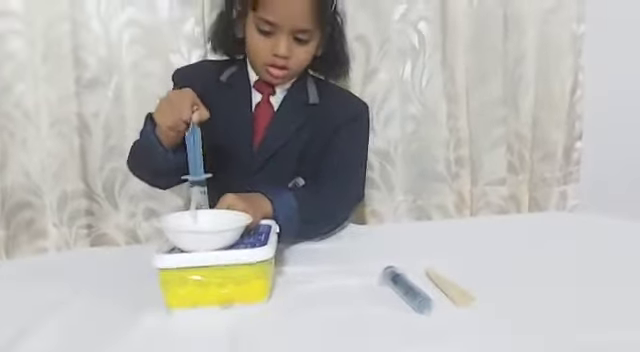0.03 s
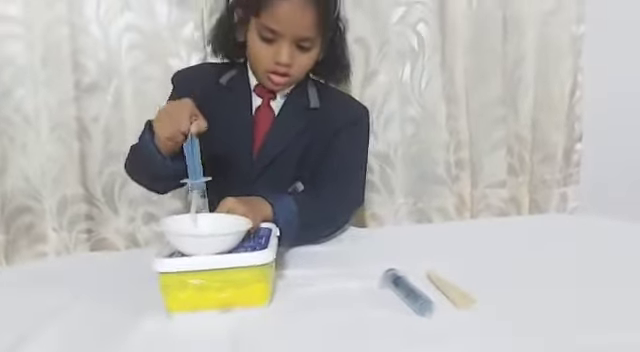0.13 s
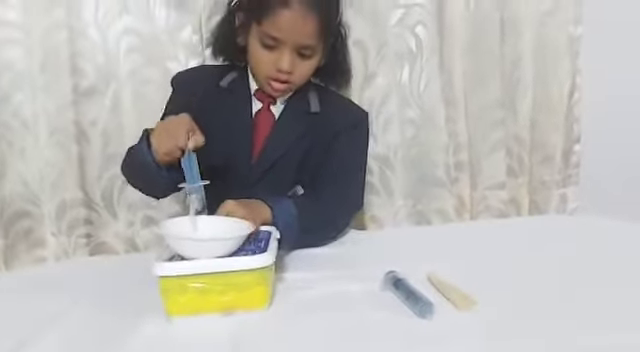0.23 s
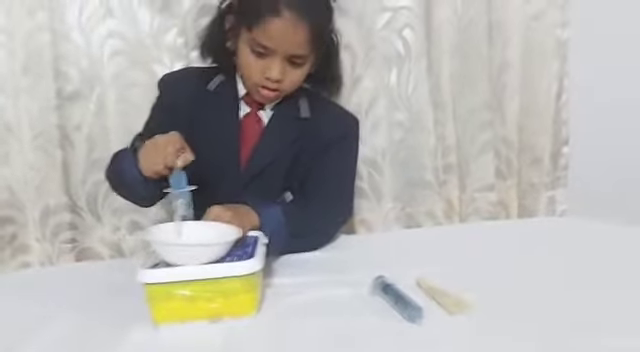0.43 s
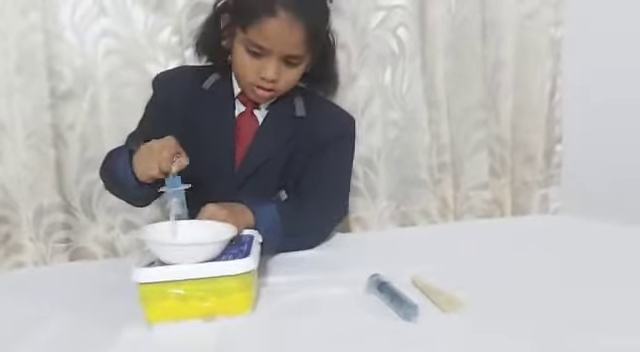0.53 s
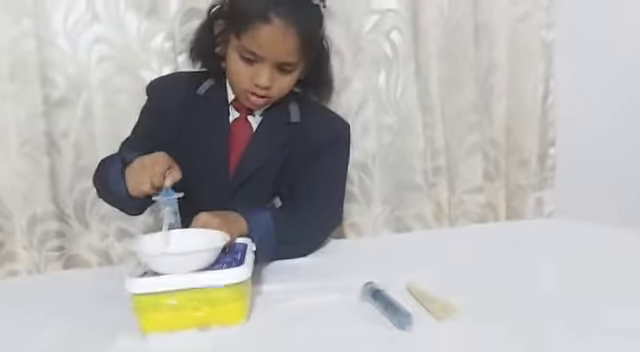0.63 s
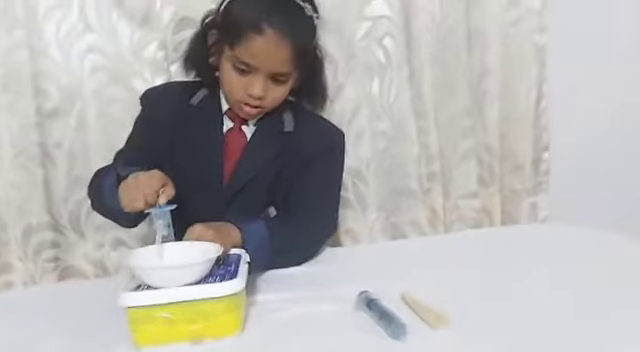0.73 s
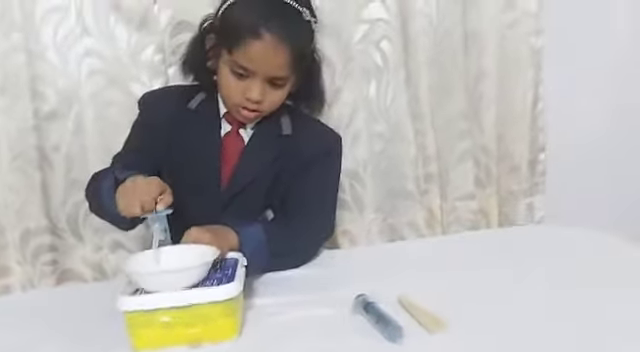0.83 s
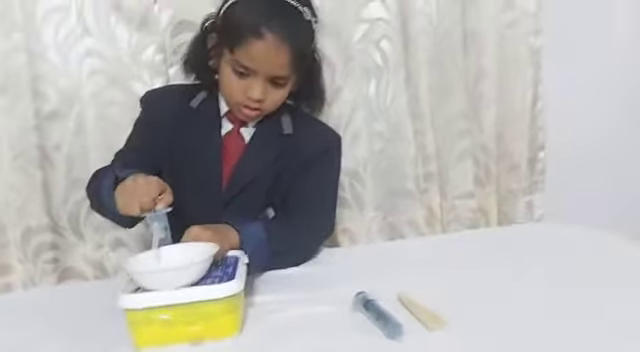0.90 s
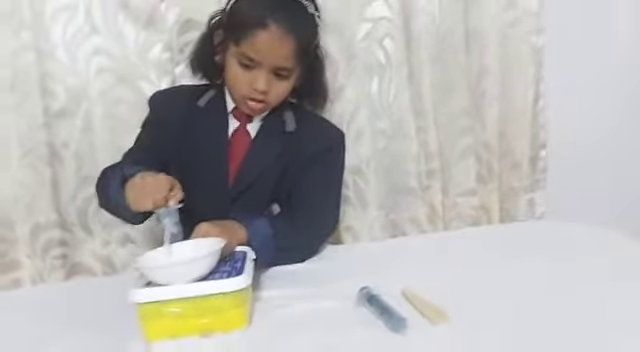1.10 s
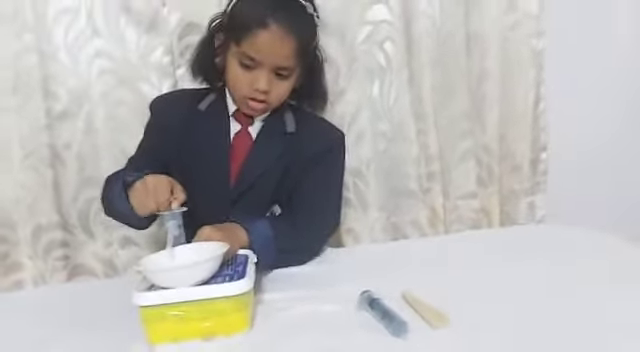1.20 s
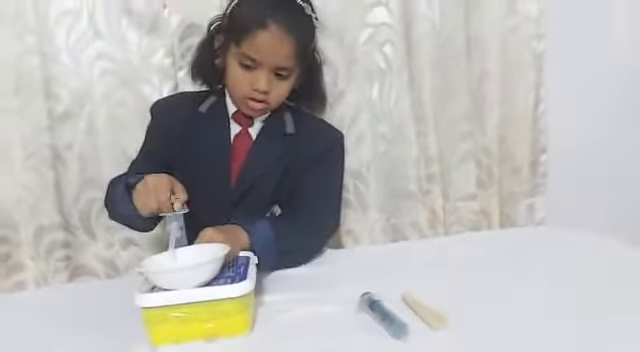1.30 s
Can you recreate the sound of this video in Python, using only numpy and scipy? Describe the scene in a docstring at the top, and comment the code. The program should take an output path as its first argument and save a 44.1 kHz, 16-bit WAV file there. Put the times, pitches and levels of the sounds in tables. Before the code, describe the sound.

A plastic syringe squirts air and liquid into a bowl with a brief falling whistle, ending in a spurt and crackling droplets. Two sharp taps hit the left microphone. Cloth rustles and things bump softly, close by in a quiet room.

```python
"""Syringe emptied into a bowl

A small, quiet room, a stereo pair close to the table. A plastic syringe is pushed out: air and liquid
whistle through the nozzle, falling in pitch, and end in a spurt with a crackle of droplets, while a few
tones ring on briefly in the room. Plastic ticks, and two sharp taps hit the left microphone.
Then cloth rustles, the nozzle dribbles, things on the table bump softly, and a thin hiss lingers."""
import sys
import numpy as np
from scipy import signal
from scipy.fft import rfft, irfft
from scipy.io import wavfile

SR = 44100
rng = np.random.default_rng(int(sys.argv[2]) if len(sys.argv) > 2 else 0)


def log_audio(samples):
    """Write samples as a 16-bit WAV file to the path given in sys.argv[1]."""
    # one column per channel
    frames = np.atleast_2d(samples).T
    # limit to full scale, then quantise
    limited = np.clip(frames, -1, 1)
    pcm = np.round(limited * 32767).astype(np.int16)
    wavfile.write(sys.argv[1], SR, pcm)


N = 59535
T = np.arange(N) / SR
HZ = np.fft.rfftfreq(N, 1 / SR)
BAND_LIMIT_HZ = 15900

# Diffuse sound at the pair. Each row: frequency in Hz, left-right correlation from -1 to 1.
PAIR_LIKENESS = [(30, 0.26), (90, 0.73), (300, 0.76), (700, 0.16), (1400, 0.031), (4500, 0), (7000, 0.22),
                 (9500, 0.97), (16000, .85)]
# The room's decay. Each row: frequency in Hz, seconds to fall 60 dB.
ROOM_DECAY = [(100, 0.63), (800, 0.38), (2000, 0.41), (4200, 0.31), (7000, 0.37), (15000, 0.28)]
# The room's hum. Each row: pitch in Hz, level in dB.
ROOM_HUM = [(102, -72), (248, -76)]

# Colours of the noises. Each row: frequency in Hz, relative spectral level in dB.
ROOM_COLOUR = [(15, -51), (25, -5), (107, 4.5), (193, -5.5), (267, -3.5), (1110, -15.5), (1240, -18),
               (1530, -17), (1850, -14), (2630, -25), (15500, -53)]
HANDLING_COLOUR = [(20, -42), (45, -15), (75, -4), (120, -3.5), (200, -10.5), (350, -10.5), (520, -21.5),
                   (1500, -50), (5000, -88)]
HISS_COLOUR = [(300, -46), (2900, -6), (4200, 3.5), (5500, -3.5), (7000, 4), (9000, -3), (12000, -1.5),
               (15500, -6)]
JET_COLOUR = [(100, -25), (400, -29.5), (1000, -13.5), (1550, -7), (2000, 3.5), (2500, 0.5), (3000, 1),
              (4700, -3.5), (5400, -12.5), (7300, -31), (8500, -25.5), (13500, -30.5), (15500, -15.5)]
SPRAY_COLOUR = [(200, -6.5), (900, -15), (1500, -12), (3500, 13), (5200, 5), (6000, -22.5), (6500, -0.5),
                (7100, 7), (8200, -13.5), (13800, -19.5), (15300, 2.5), (16000, -13)]
DROPLET_COLOUR = [(1500, -29.5), (4000, 12), (6000, 4.5), (9000, -3.5), (14000, -16)]
CLOTH_COLOUR = [(60, -1.5), (250, -6), (430, 3), (620, 1.5), (1000, 1.5), (1600, -2.5), (2500, -3.5),
                (4300, -9), (5500, -19), (9000, -22.5), (16000, -50)]

# How each sound swells and fades. Each row: time in seconds, level in dB.
HANDLING_LEVEL = [(0, -85.5), (.2, -80.5), (.24, -54), (.33, -49.5), (.43, -58.5), (.5, -70), (.62, -72.5),
                  (.8, -52), (.87, -59.5), (.93, -55.5), (1.04, -64.5), (1.11, -57.5), (1.35, -67.5)]
HISS_LEVEL = [(0, -84.5), (.45, -73), (.68, -76), (.82, -68.5), (.96, -66.5), (1.06, -67), (1.11, -66),
              (1.18, -63.5), (1.25, -67), (1.35, -73.5)]
JET_LEVEL = [(.2, -60), (.2045, -42), (.218, -37), (.227, -32.5), (.25, -37.5), (.27, -34.5), (.303, -41),
             (.315, -30.5), (.327, -36.5), (.35, -61), (.39, -62.5), (.43, -87)]
WHISTLE_LEVEL = [(.203, -73.5), (.2125, -37.5), (.218, -45), (.2225, -39), (.226, -31), (.2315, -25),
                 (.236, -43), (.3, -50), (.312, -24), (.317, -47), (.3205, -24.5), (.327, -47),
                 (.335, -40.5), (.344, -47), (.38, -51.5)]
CLOTH_LEVEL = [(.45, -103), (.56, -78), (.64, -70), (.71, -59), (.77, -50.5), (.82, -52), (.88, -56),
               (.95, -59.5), (1.02, -69), (1.13, -73.5), (1.19, -77.5), (1.35, -81)]
DRIBBLE_LEVEL = [(.46, -72), (.54, -71), (.62, -69.5), (.71, -63.5), (.78, -73), (.85, -89)]

# Fixed resonances. Each row: centre in Hz, width in Hz, relative level in dB.
PLASTIC_RESONANCES = [(2280, 210, 13.5), (2850, 170, 4), (4440, 270, 7), (6200, 560, 4.5)]
BARREL_BOWL_RESONANCES = [(820, 130, -14), (2620, 260, -10), (3600, 450, -8), (4200, 250, -11),
                          (4660, 300, -15), (7050, 500, -19)]
BOX_RESONANCES = [(258, 30, -10), (592, 78, -14), (764, 68, -15.5), (1167, 160, -24.5)]
DRIBBLE_RESONANCES = [(1370, 140, 2), (1980, 610, 2.5), (2920, 1500, -9), (4800, 1100, -2)]

# Plastic ticks. Each row: start in seconds, peak in dB, low and high edge in Hz, decay in seconds,
# left over right in dB.
PLASTIC_TICKS = [(0.0804, -60, 595, 2540, 0.0021, 16), (0.0966, -54.5, 5940, 7900, 0.0021, 26),
                 (0.2033, -39.5, 3000, 6850, 0.0061, 3), (0.2568, -22, 880, 8500, .0006, 26),
                 (0.3416, -32, 5500, 10000, .0012, 5), (0.7677, -40, 1970, 4340, 0.0031, -6),
                 (0.9746, -46, 4700, 6900, 0.0021, -5.5), (1.0925, -46.5, 3800, 5960, 0.0017, -1),
                 (1.0996, -46.5, 4000, 12000, .002, 7)]
# Taps on the left microphone. Each row: start in seconds, peak of the swing in dB, low and high edge
# in Hz, snap relative to the swing in dB.
MICROPHONE_TAPS = [(0.0961, -28, 144, 448, -33), (0.279, -8.5, 551, 1464, -20)]
# Table bumps. Each row: start in seconds, level in dB, pitch in Hz, rise and decay in seconds.
TABLE_BUMPS = [(0.099, -53.5, 66.7, 0.0047, 0.016), (0.666, -47.5, 100, 0.027, 0.018),
               (.765, -53, 255, 0.02, 0.026), (0.787, -63, 102, 0.033, 0.011),
               (.8, -56.5, 596, 0.014, 0.07), (0.896, -47.5, 76, 0.04, 0.019),
               (0.899, -49, 163, 0.0046, 0.043), (1.074, -51, 275, 0.0033, 0.014),
               (1.081, -48.5, 88.3, 0.016, 0.01), (1.156, -53.5, 580.4, 0.0011, 0.0085),
               (1.163, -68.5, 744, 0.0032, 0.016), (1.221, -57.5, 115.8, 0.0058, 0.033)]
# The nozzle's two resonances: the lower is the whistle's pitch, the upper sinks as the barrel empties.
# Each row: time in seconds, frequency in Hz.
NOZZLE_LOWER = [(.2, 2660), (.228, 2690), (.243, 2626), (.262, 2391), (.28, 2435), (.3, 2153), (.316, 2149),
                (.325, 1902), (.36, 1885)]
NOZZLE_UPPER = [(.204, 5014), (.215, 4700), (.232, 4480), (.255, 4200), (.32, 4098), (.342, 3830)]
# Tones that ring on in the room. Each row: pitch in Hz, level in dB, seconds to fall 60 dB.
RING_TONES = [(1812, -44.5, 0.39), (1868, -32.5, 0.22), (2052, -43.5, 0.31), (2140, -44, 0.36),
              (3485, -41.5, 0.19), (3860, -38, 0.29), (4157, -53, 0.34), (4450, -50.5, 0.39),
              (4645, -41, 0.32)]

SPURT_S, RING_S = .308, .317


def amp(db):
    """Decibels to gain."""
    return 10 ** (np.asarray(db) / 20)


def unit(x):
    """Scales to rms 1."""
    return x / np.sqrt(np.mean(x ** 2) + 1e-20)


def over_hz(points, hz):
    """Reads a table on a log-frequency axis."""
    f, value = np.transpose(points)
    return np.interp(np.log(hz + 1), np.log(f), value)


def over_time(points):
    """Reads a curve at every sample."""
    return np.interp(T, *np.transpose(points))


def burst(points):
    """Gain from a dB curve, silent outside it."""
    return amp(np.interp(T, *np.transpose(points), left=-200, right=-200))


def struck(start, decay_s):
    """Gain that jumps to 1 and dies away."""
    return (T >= start) * np.exp(-abs(T - start) / decay_s)


def pan(db):
    """Gains of the two microphones; positive dB favours the left."""
    return amp(np.array([[db], [-db]]) / 2)


def wander(hz):
    """Random drift of rms 1, mostly slower than hz."""
    return unit(irfft(rfft(rng.standard_normal(N)) / (1 + (HZ / hz) ** 4), N))


def band(hz, width):
    """Noise of rms 1 in a resonance that may move."""
    phase = 2 * np.pi * np.cumsum(hz * np.ones(N)) / SR
    skirt = 1 / (1 + (2 * HZ / width) ** 2)
    a, b = irfft(rfft(rng.standard_normal((2, N))) * skirt, N)
    return unit(a * np.cos(phase) + b * np.sin(phase))


def resonant_noise(resonances):
    """Noise in a set of fixed resonances."""
    return sum(amp(db) * band(hz, width) for hz, width, db in resonances)


def diffuse():
    """Spectra of white noise, partly alike at the two microphones."""
    a, b = rfft(rng.standard_normal((2, N)))
    likeness = np.clip(over_hz(PAIR_LIKENESS, HZ), -1, 1)
    return np.array([a, likeness * a + np.sqrt(1 - likeness ** 2) * b])


def noise(colour):
    """Coloured stereo noise of rms 1."""
    return unit(irfft(diffuse() * amp(over_hz(colour, HZ)), N))


def room(x, build_s=0.0072):
    """The small room's reverberation of a mono sound, each band dying at its own speed."""
    hz, t, spectra = signal.stft(irfft(diffuse(), N), SR, nperseg=256)
    decay = amp(-60 * t / over_hz(ROOM_DECAY, hz)[:, None])
    tail = signal.istft(spectra * decay, SR, nperseg=256)[1][:, :N]
    tail *= 1 - np.exp(-T / build_s)
    return signal.fftconvolve(x[None], tail / np.linalg.norm(tail[0]), axes=1)[:, :N]


def direct(x, lag_s):
    """The sound reaches the left microphone first."""
    return np.array([x, irfft(rfft(x) * np.exp(-2j * np.pi * HZ * lag_s), N)])


def room_tone():
    """The quiet room: faint noise with a low hum."""
    hum = sum(amp(db) * band(hz, width=20) for hz, db in ROOM_HUM)
    return (amp(-73) * noise(ROOM_COLOUR) + hum) * pan(db=-4.5)


def handling():
    """Low rumble of handling, a little to the right."""
    return noise(HANDLING_COLOUR) * amp(over_time(HANDLING_LEVEL)) * pan(db=-3.0)


def thin_hiss(flicker_db=0.87):
    """A thin, flickering hiss lingers near the middle of the pair."""
    level_db = over_time(HISS_LEVEL) + flicker_db * wander(hz=60)
    return noise(HISS_COLOUR) * amp(level_db) * pan(db=0.5)


def ticks(wet_db=-8):
    """Brief bright cracks, coloured by the resonances of the plastic."""
    out = np.zeros((2, N))
    for start, db, low_hz, high_hz, decay_s, side_db in PLASTIC_TICKS:
        crack = struck(start, decay_s) * rng.standard_normal((2, N))
        x = crack + sum(amp(gain_db) * signal.lfilter(*signal.iirpeak(hz, hz / width, fs=SR), crack)
                        for hz, width, gain_db in PLASTIC_RESONANCES)
        x = signal.sosfilt(signal.butter(3, low_hz, "high", fs=SR, output="sos"), x)
        x = signal.sosfilt(signal.butter(2, high_hz, fs=SR, output="sos"), x)
        sides = pan(side_db) / pan(side_db).max()
        out += amp(db) * x / abs(x).max() * sides
    return out + amp(wet_db) * room(out.mean(0))


def taps(rattle_db=-60.5, leak_db=-51, wet_db=-22.5):
    """Right on the left microphone: one swing of pressure, a tiny snap, a short rattle of the casing."""
    x = np.zeros(N)
    for start, db, low_hz, high_hz, snap_db in MICROPHONE_TAPS:
        push = -signal.unit_impulse(N, round(start * SR))
        swing = signal.sosfilt(signal.butter(2, [low_hz, high_hz], "band", fs=SR, output="sos"), push)
        snap = struck(start, decay_s=.0004) * rng.standard_normal(N)
        rattle = struck(start, decay_s=0.012) * band(hz=943, width=2400)
        x += amp(db) * (swing / abs(swing).max() + amp(snap_db) * snap) + amp(rattle_db) * rattle
    return np.array([x, amp(leak_db) * x]) + amp(wet_db) * room(x)


def bumps(roughness=0.53, relative_width=0.34, wet_db=-7.5):
    """Dull, damped swings of the table and the box under the bowl, to the right."""
    x = np.zeros(N)
    for start, db, hz, rise_s, decay_s in TABLE_BUMPS:
        age = T - start
        swing = np.sin(2 * np.pi * hz * age) + roughness * band(hz, hz * relative_width)
        envelope = np.clip(age / rise_s, 0, 1) * np.exp(-np.maximum(age - rise_s, 0) / decay_s)
        x += amp(db) * envelope * swing
    return (x + amp(wet_db) * room(x)) * pan(db=-5)


def jet(sputter=0.25, direct_db=-3, wet_db=-3.5):
    """Sputtering turbulence sounds the nozzle's sliding resonances and those of barrel and bowl."""
    lower = amp(-1) * band(over_time(NOZZLE_LOWER), width=220)
    upper = amp(-3) * band(over_time(NOZZLE_UPPER), width=470)
    body = resonant_noise(BARREL_BOWL_RESONANCES)
    hiss = amp(0.5) * noise(JET_COLOUR)[0]
    x = unit((lower + upper + body + hiss) * np.exp(sputter * wander(hz=257))) * burst(JET_LEVEL)
    return (amp(direct_db) * direct(x, lag_s=0.000179) + amp(wet_db) * room(x)) * pan(db=-1.5)


def whistle(wobble=0.01613, wet_db=-14):
    """The nozzle's clean, slightly unsteady tone locks in briefly, then throbs in the last surge."""
    hz = over_time(NOZZLE_LOWER) * (1 + wobble * wander(hz=150))
    x = np.sqrt(2) * np.sin(2 * np.pi * np.cumsum(hz) / SR) * burst(WHISTLE_LEVEL)
    return direct(x, lag_s=0.00017) + amp(wet_db) * room(x)


def spurt(level_db=-33, rise_s=0.0028, fade_db_per_s=337, grain=0.55, wet_db=-9.5):
    """The last surge leaves the nozzle as a bright, grainy spray."""
    age = T - SPURT_S
    envelope = np.clip(age / rise_s, 0, 1) * amp(level_db - fade_db_per_s * np.maximum(age - rise_s, 0))
    x = unit(noise(SPRAY_COLOUR) * np.exp(grain * wander(hz=500))) * envelope
    return (x + amp(wet_db) * room(x[0])) * pan(db=-1.0)


def droplets(first_per_s=740, thinning_s=0.19, fade_db_per_s=63, spread_db=3, wet_db=-4):
    """After the spurt, tiny drops crackle in the bowl, ever fewer and fainter."""
    age = np.maximum(T - SPURT_S, 0)
    drops_per_s = first_per_s * np.exp(-age / thinning_s)
    lands = (age > 0) * (rng.random(N) < drops_per_s / SR)
    size_db = spread_db * np.minimum(rng.exponential(1, (2, N)), 2)
    impacts = lands * amp(-40.5 - fade_db_per_s * age + size_db) * rng.choice([-1, 1], N)
    x = irfft(rfft(impacts) * amp(over_hz(DROPLET_COLOUR, HZ)), N)
    return x + amp(wet_db) * room(x[0])


def ring(rise_s=0.012, waver_rad=0.42):
    """A few tones ring on briefly in the room after the whistle's last surge."""
    age = np.maximum(T - RING_S, 0)
    x = np.zeros(N)
    for hz, db, t60 in RING_TONES:
        phase = 2 * np.pi * (hz * age + rng.random()) + waver_rad * wander(hz=40)
        x += amp(db - 60 * age / t60) * np.sin(phase)
    return direct(x * np.minimum(age / rise_s, 1), lag_s=.00006) * pan(db=-6.0)


def cloth(grain=0.094):
    """Cloth slides, and the hollow box under the bowl answers the rubbing."""
    hollow = resonant_noise(BOX_RESONANCES)
    rubbing = (noise(CLOTH_COLOUR) + hollow) * np.exp(grain * wander(hz=180))
    return unit(rubbing) * burst(CLOTH_LEVEL) * pan(db=-2.5)


def dribble(grain=0.21):
    """A faint, grainy fizz as the nozzle runs dry, mostly in the right microphone."""
    fizz = np.array([resonant_noise(DRIBBLE_RESONANCES) for channel in range(2)])
    return unit(fizz * np.exp(grain * wander(hz=200))) * burst(DRIBBLE_LEVEL) * pan(db=-8.5)


def scene():
    """Everything that reaches the pair."""
    squirt = jet() + whistle() + spurt() + ring() + droplets()
    knocks = taps() + ticks() + bumps()
    return squirt + knocks + cloth() + handling() + thin_hiss() + room_tone() + dribble()


def record(dry):
    """The recorder's band limit."""
    lowpass = signal.firwin(511, BAND_LIMIT_HZ, window=("kaiser", 9), fs=SR)
    return signal.oaconvolve(dry, lowpass[None], "same")


dry = scene()
out = record(dry)
log_audio(out)
```